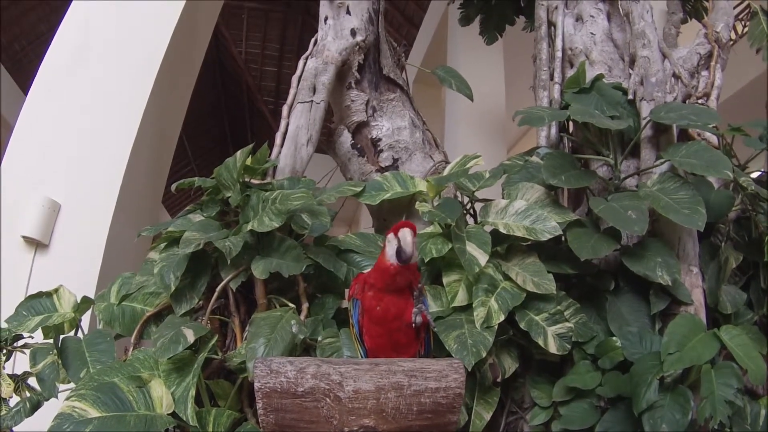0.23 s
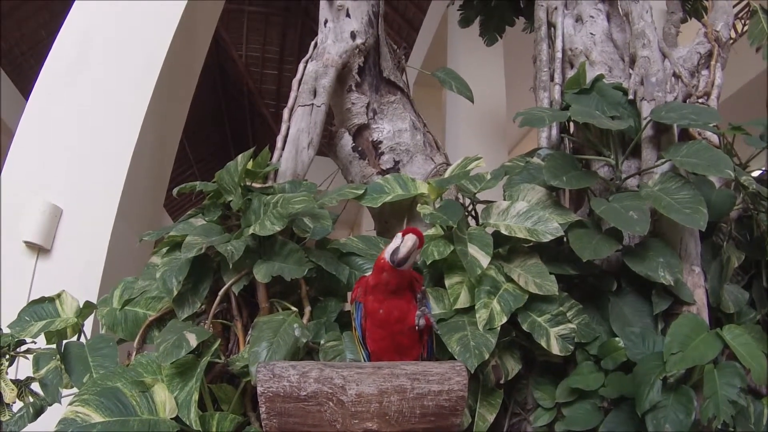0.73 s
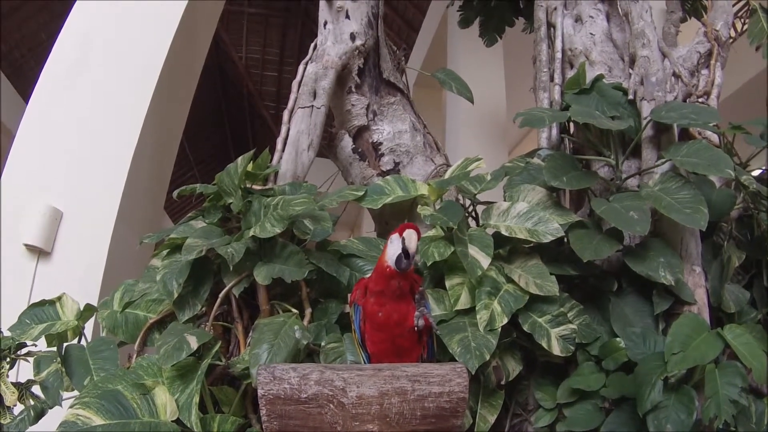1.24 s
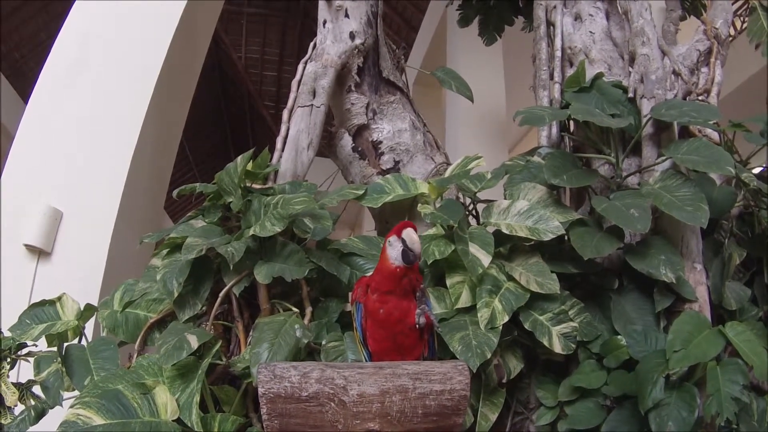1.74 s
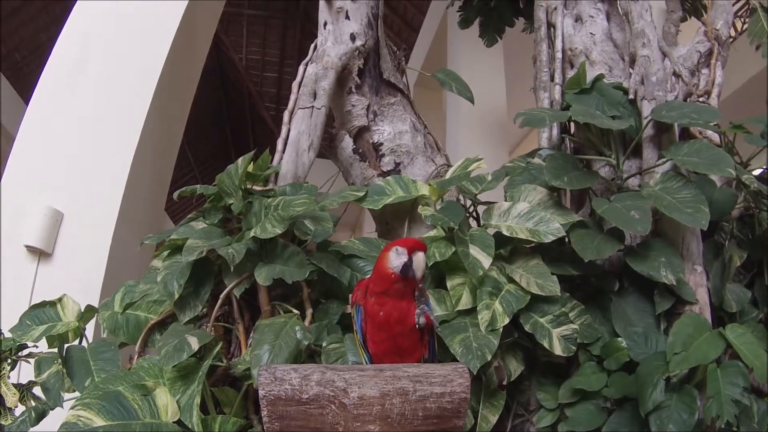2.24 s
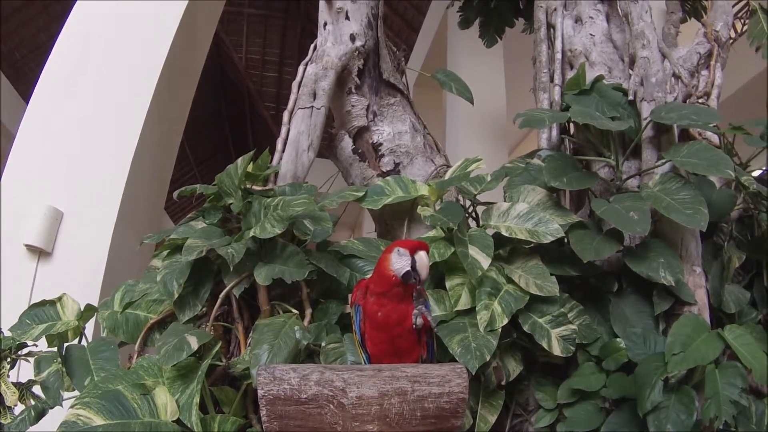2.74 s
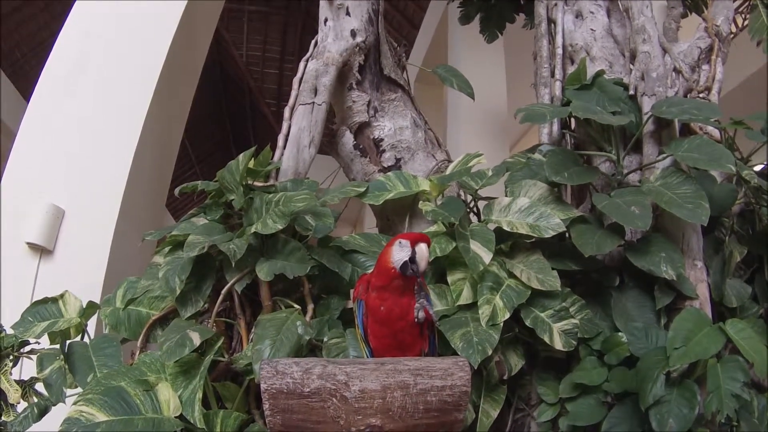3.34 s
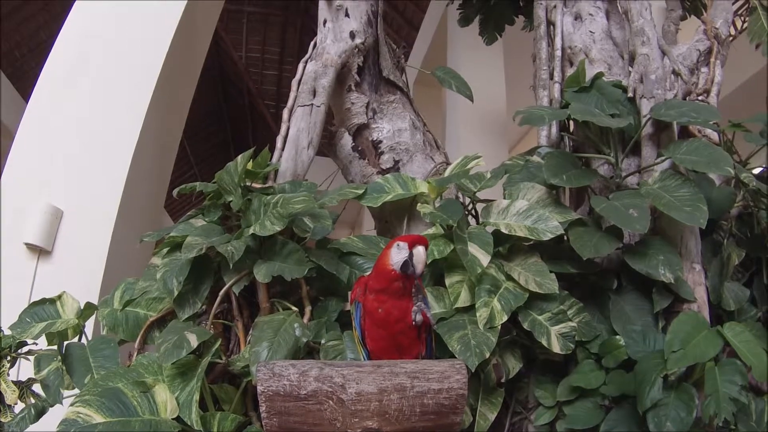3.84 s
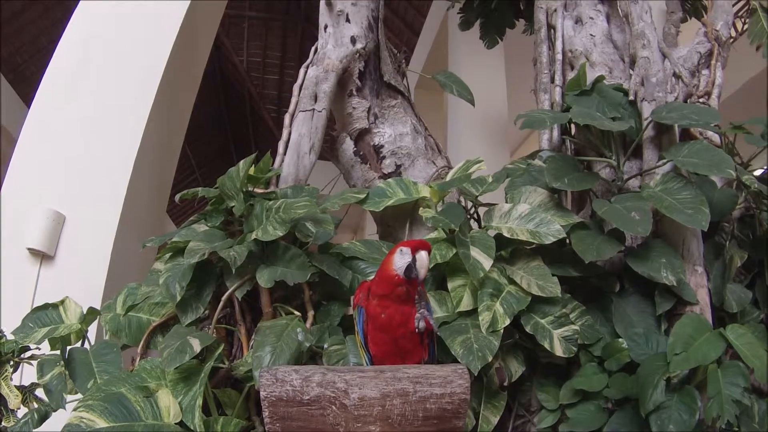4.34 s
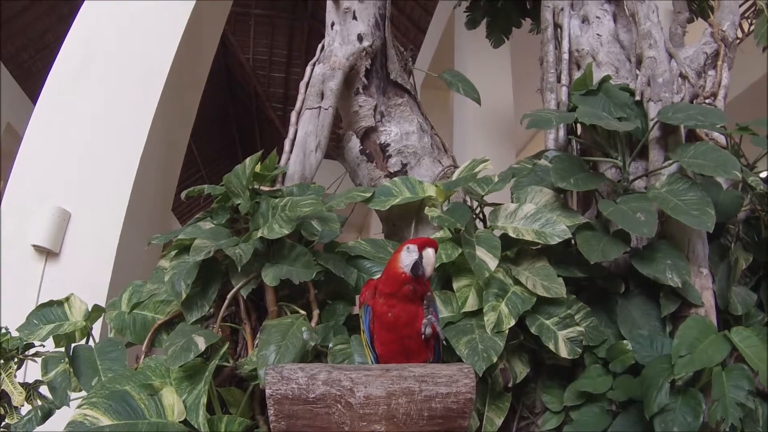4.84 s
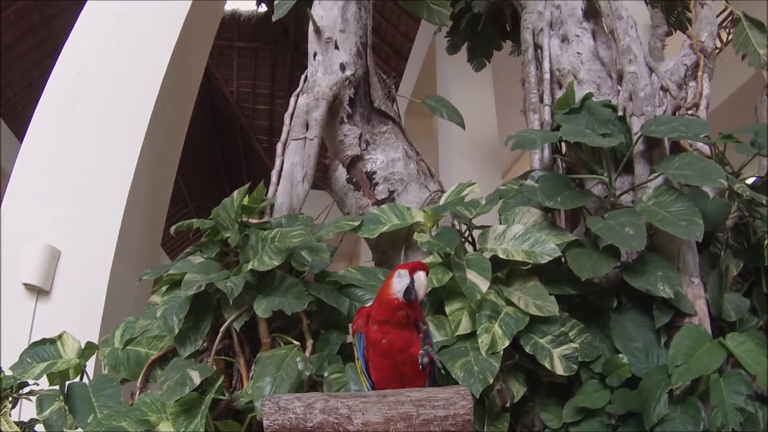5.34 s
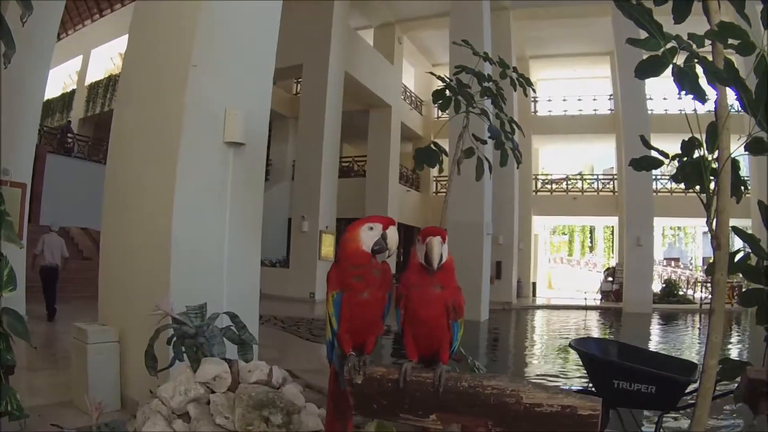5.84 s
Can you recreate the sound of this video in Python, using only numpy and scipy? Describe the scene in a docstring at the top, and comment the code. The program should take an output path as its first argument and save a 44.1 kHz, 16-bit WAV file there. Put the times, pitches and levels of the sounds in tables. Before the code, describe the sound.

A macaw gives three short, harsh squawks in an echoing hall over faint water hiss, then wind rumble and handling clicks.

```python
"""A wide open hall, heard through a small camera's microphone. From the start water hisses far off
and a faint draught buffets the microphone; a finger ticks on the camera body. Close by, a macaw
squawks at 1.1, 2.4 and 4.1 s: rough pulses from its syrinx ring through throat, windpipe, beak and
mouth, and the hall answers. Near 5 s the draught swells amid finger ticks and low thumps. At 5.6 s
a brief dropout cuts off a low swell with a click; a last tick follows as the draught dies down."""
import sys
import numpy as np
from scipy import signal
from scipy.fft import rfft, irfft, next_fast_len
from scipy.io import wavfile
from scipy.ndimage import uniform_filter1d, map_coordinates

SR = 44100
rng = np.random.default_rng(int(sys.argv[2]) if len(sys.argv) > 2 else 0)


def put_to_file(sound):
    """Save the sound as 16-bit audio at rate SR, in the file named by the first command-line argument."""
    columns = np.atleast_2d(sound).T  # one column per channel
    safe = np.clip(columns, -1, 1)
    whole_steps = np.round(safe * 32767)
    wavfile.write(sys.argv[1], SR, whole_steps.astype(np.int16))


N = 268965

# Far water, ahead of the microphone port: (time [s], level [dB])
WATER_LEVEL = [(0, -54.5), (4.6, -55), (5.6, -55), (5.7, -58), (6.1, -60.5)]
# Colour of its hiss: (frequency [Hz], relative density [dB])
WATER_SPECTRUM = [(71, -7), (120, -5), (260, -10.5), (432, -11.5), (917, -14.5), (1430, -12.5),
                  (2290, -11.5), (2700, -19), (6730, -23.5), (14600, -41), (15500, -62.5)]
# Draught on the microphone: (time [s], level [dB])
DRAUGHT_LEVEL = [(0, -41), (2.1, -46.5), (2.6, -51.5), (3.5, -49.5), (4.5, -48.5), (4.85, -28.5),
                 (5.45, -25.5), (5.7, -31.5), (6.1, -40.5)]
# Colour of its buffeting: (frequency [Hz], relative density [dB])
DRAUGHT_SPECTRUM = [(4.7, -34), (8.0, 2.5), (19, 1.5), (41, -6.5), (308, -43.5), (400, -50.5), (520, -60),
                    (880, -120)]
# Fingers on the camera: (time [s], knock peak [dB], knock [Hz], snap [dB re knock], snap [Hz], t60 [s])
FINGER_TICKS = [(0.217, -36, 1450, -3.5, 3600, 0.019), (4.912, -26.5, 2180, -26, 4930, 0.0077),
                (5.032, -27, 1190, -11, 9600, 0.0066), (5.151, -29.5, 1160, -7, 5300, 0.011),
                (5.283, -32.5, 1370, -25.5, 2500, 0.026), (5.687, -37.5, 1920, -14.5, 7050, 0.11)]
# Short thumps and, at 5.567 s, a slow low swell: (time [s], peak [dB], time constant [s])
LOW_PULSES = [(0.221, -32, 0.0057), (0.546, -31.5, 0.0029), (1.93, -35.5, 0.0049), (2.55, -35, 0.0027),
              (3.877, -38.2, 0.002), (4.661, -32, 0.0042), (4.907, -24, 0.0053), (5.027, -18, 0.0043),
              (5.149, -18, 0.0096), (5.567, -24, 0.041), (5.689, -24, 0.0097)]
# One curve a squawk: (time [s], effort as windpipe level [dB], mouth [Hz], beak [dB re windpipe])
SQUAWKS = [
    [(1.12, -65.5, 6930, -18), (1.145, -45.5, 6800, -9.5), (1.17, -37.5, 6660, -4),
     (1.21, -34.5, 6470, -18), (1.245, -43, 6320, -21), (1.268, -53, 6430, -18), (1.31, -44.5, 6850, -10),
     (1.335, -37, 6250, -9), (1.385, -40, 6400, -9), (1.42, -42, 6550, -10), (1.445, -64, 6700, -23)],
    [(2.4, -62, 5920, 1), (2.45, -48.5, 6370, -4), (2.485, -37, 6400, -10), (2.55, -40.5, 6270, -5.5),
     (2.625, -36, 6480, -4), (2.692, -38.5, 6630, -1.5), (2.712, -41.5, 6770, -20),
     (2.742, -36.5, 6740, -20.5), (2.785, -40, 6420, -26.5), (2.812, -39, 6800, -26),
     (2.828, -30.5, 6890, -28), (2.87, -45.5, 6620, -22.5), (2.89, -40, 6800, -27),
     (2.935, -42.5, 6650, -25), (2.97, -60, 6740, -14)],
    [(4.08, -66, 6880, 1), (4.14, -51.5, 6680, 6.5), (4.175, -39, 6400, -1.5), (4.197, -32.5, 6220, -4),
     (4.235, -35, 6600, -8), (4.306, -36, 6400, -13.5), (4.36, -41.5, 6650, -7.5), (4.39, -41.5, 7050, -11),
     (4.42, -52.5, 6500, -14)],
]
# Vocal postures: (start [s], pulse-pair rate from [Hz], to [Hz], throat [Hz], base roughness [0-1],
# evenness of the two pulses [0-1], base throat, lower mouth, upper mouth [each dB re windpipe])
VOCAL_POSTURES = [(1.119, 317.9, 323.5, 1580, 0.43, 0.65, -6, -28, -12.5),
                  (1.169, 328.3, 278.6, 1390, 0.31, 0, -2, -37, -12),
                  (1.275, 283, 290, 1410, 0.51, .1, 1.5, -31, -13.5),
                  (1.322, 259.5, 262.6, 1560, 0.4, .45, -1, -30, -20),
                  (1.37, 266, 280.2, 1490, 0.2, 0.6, 0, -17.5, -14),
                  (2.4, 479.7, 471.6, 1300, 0.6, 0, -2.5, -12.5, -15),
                  (2.523, 389.4, 374.2, 1490, .62, 0.57, -1.5, -11, -12),
                  (2.7, 374, 370.9, 1555, 0.69, 0.6, -3, -15, -17.5),
                  (2.75, 343.7, 338.6, 1060, 0.24, 0, -1.5, -15, -15),
                  (2.803, 381.8, 384.2, 1544, 0.39, 0.02, -1.5, -14.5, -15.5),
                  (2.845, 380, 392.5, 1520, 0.72, .3, -6, -19.5, -20),
                  (4.08, 290.9, 291.4, 1440, .5, .87, 2, -8, -11),
                  (4.159, 288.8, 298.2, 1200, 0.34, 1, -5, -11, -17.5),
                  (4.233, 326.8, 325.5, 1420, 0.45, 0.2, -4.5, -18, -18),
                  (4.318, 371.5, 390.6, 1540, 0.54, .4, -4, -14.5, -16.5)]
# Windpipe resonances: (frequency [Hz], width [Hz], gain [dB])
WINDPIPE_MODES = [(1950, 160, -5), (2300, 150, 0), (2480, 200, -5)]
# Beak resonances: (frequency [Hz], width [Hz], gain [dB])
BEAK_MODES = [(2980, 260, 0), (3540, 450, -4), (4040, 420, -7)]
# Upper mouth bands: (multiple of the mouth frequency [ratio], width [Hz], gain [dB])
UPPER_MOUTH_BANDS = [(1, 625, 7), (1.45, 690, -8), (1.88, 800, -15.5)]
# Reverberation of the hall: (frequency [Hz], t60 [s])
HALL_DECAY = [(300, .6), (1500, 0.86), (2300, 1), (3000, 0.83), (4000, 0.8), (10000, 0.4)]
# Resonances of the microphone port: (frequency [Hz], width [Hz], gain [dB])
MIC_PORT_MODES = [(1530, 132, -0.5), (1890, 65, -7), (2344, 135, -2), (2975, 53, -2), (4880, 78, -9.5)]

POSTURE_SHIFT_S = 0.016
# Below full effort the voice roughens and the throat stands out more.
FULL_EFFORT_DB, ROUGH_PER_DB, THROAT_PER_DB = -38, 0.08, 0.18
SILENCE_FROM_S, SILENCE_TO_S = 5.592, 5.6735
ROLLOFF_HZ, TOP_HZ = 14800, 16300


def amp(db):
    """Decibels to amplitude."""
    return 10 ** (np.asarray(db) / 20)


def unit(x):
    """x scaled to an RMS of 1."""
    return x / np.sqrt(np.mean(x ** 2) + 1e-20)


def along(points, hz):
    """(frequency [Hz], value) points, read on a log axis."""
    f, values = np.transpose(points)
    return np.interp(np.log(hz + 1), np.log(f + 1), values)


def curves(rows, t):
    """Every column after the time, read at times t."""
    times, *columns = np.transpose(rows)
    return [np.interp(t, times, column) for column in columns]


def wobble(rate, size):
    """A smooth random curve, rate knots a second."""
    knots = rng.standard_normal(int(size * rate / SR) + 4)
    return map_coordinates(knots, [np.arange(size) * rate / SR])


def filtered(x, response):
    """x through a complex frequency response."""
    size = next_fast_len(len(x) + 8192)
    return irfft(rfft(x, size) * response(np.fft.rfftfreq(size, 1 / SR)), size)[:len(x)]


def peak(f, hz, width_hz):
    """One causal resonance of gain 1."""
    return 1j * f * width_hz / (hz * hz - f * f + 1j * f * width_hz)


def modes(f, table):
    """Resonances summed with alternating signs."""
    return sum((-1) ** k * amp(db) * peak(f, hz, width) for k, (hz, width, db) in enumerate(table))


def moving(x, track_hz, response):
    """A resonance that follows track_hz: five still ones, cross-faded."""
    steps = np.linspace(track_hz.min() - 1, track_hz.max() + 1, num=5)
    fades = np.clip(1 - abs(track_hz - steps[:, None]) / (steps[1] - steps[0]), 0, 1)
    return sum(fade * filtered(x, lambda f: response(f, hz)) for fade, hz in zip(fades, steps))


def water():
    """Water far from the microphone: a smooth hiss with faint patches."""
    spectra = signal.stft(rng.standard_normal(N), nperseg=512)[2]
    patches = uniform_filter1d(rng.standard_normal(spectra.shape), 6, axis=0)
    patches = uniform_filter1d(patches, 14, axis=1)
    noise = signal.istft(spectra * amp(1.78 * unit(patches)), nperseg=512)[1][:N]
    hiss = filtered(noise, lambda f: amp(along(WATER_SPECTRUM, f)))
    level_db = curves(WATER_LEVEL, np.arange(N) / SR)[0]
    return amp(level_db) * unit(hiss)


def draught():
    """Moving air pushes the microphone's diaphragm in slow lumps."""
    push = filtered(rng.standard_normal(N), lambda f: amp(along(DRAUGHT_SPECTRUM, f)))
    lumps = amp(2.5 * wobble(12, N))
    level_db = curves(DRAUGHT_LEVEL, np.arange(N) / SR)[0]
    return amp(level_db) * unit(lumps * push)


def fingers():
    """Fingers tick on the camera body: short noisy knocks with a high snap."""
    out, t = np.zeros(N + SR), np.arange(SR // 4) / SR
    for start, db, knock_hz, snap_db, snap_hz, t60 in FINGER_TICKS:
        burst = rng.standard_normal(len(t)) * amp(-60 * t / t60) * (1 - np.exp(-t / 0.00083))
        knock = filtered(burst, lambda f: peak(f, knock_hz, 460) * peak(f, 0.63 * knock_hz, 1400))
        snap = filtered(burst, lambda f: peak(f, snap_hz, 0.47 * snap_hz) ** 2)
        tick = knock / abs(knock).max() + amp(snap_db) * snap / abs(snap).max()
        out[round(start * SR):][:len(t)] += amp(db) * tick
    return out[:N]


def low_pulses():
    """Single pressure pulses: the short ones thump, the slow one swells."""
    out, t = np.zeros(N + SR), np.arange(SR // 4) / SR
    for start, db, tau in LOW_PULSES:
        age = t / tau
        pulse = age * (2 - age) * np.exp(-age)
        out[round(start * SR):][:len(t)] += amp(db) * pulse / pulse.max()
    return out[:N]


def posture(t):
    """The bird holds each posture while its pulse rate glides, then shifts quickly into the next."""
    rows = [row for row in VOCAL_POSTURES if t[0] - POSTURE_SHIFT_S < row[0] < t[-1]]
    ends = [row[0] for row in rows[1:]] + [t[-1]]
    knots = []
    for (start, from_hz, to_hz, *held), end in zip(rows, ends):
        knots.append((start + POSTURE_SHIFT_S / 2, from_hz, *held))
        knots.append((end - POSTURE_SHIFT_S / 2, to_hz, *held))
    return curves(knots, t)


def syrinx(pair_hz, rough, even):
    """Two pulses a cycle; roughness shakes their timing and size and mixes in turbulent air."""
    size = len(rough)
    rough, even = np.clip(rough, 0, 1), np.clip(even, 0, 1)
    waver = 0.0306 * wobble(120, size) + 0.03 * wobble(30, size)
    count = np.cumsum(2 * pair_hz * (1 + rough * waver)) / SR
    beats = np.arange(1, int(count[-1]) - 1)
    # Jitter blurs the high harmonics first.
    jitter = 0.096 * rng.standard_normal(len(beats)) * np.interp(beats, count, rough)
    at = np.interp(beats + jitter, count, np.arange(size))
    i = at.astype(int)
    strength = np.where(beats % 2, 1, even[i]) * amp(5.8 * rough[i] * rng.standard_normal(len(i)))
    pulses = np.bincount(i, strength * (1 - at + i), size + 1)
    pulses += np.bincount(i + 1, strength * (at - i), size + 1)
    # Air is breathed through the slit once a cycle; the membranes catch and let go.
    air = unit(rng.standard_normal(size) * (1 + 0.39 * np.cos(np.pi * count)))
    flutter = amp(4.4 * rough * np.tanh(wobble(59.07, size)))
    falling_sweep = lambda f: np.exp(1j * np.pi * 0.004 * (f - 4500).clip(0) ** 2 / 4500)
    buzz = unit(filtered(pulses[:size], falling_sweep) / np.sqrt(pair_hz * (1 + even ** 2)))
    voiced = np.sqrt(1 - rough ** 3) * buzz + rough ** 1.5 * air
    return flutter * voiced, flutter * air


def throat_response(f, hz):
    """The throat rings at hz, with a weaker resonance below."""
    return (peak(f, hz, 260) - amp(-14) * peak(f, 0.43 * hz, 550)) * peak(f, 1087, 1830) ** 2


def lower_mouth(f, hz):
    """One thin band below the mouth frequency."""
    return peak(f, 0.81 * hz, 280) * peak(f, 0.78 * hz, 1500)


def upper_mouth(f, hz):
    """Thin bands at and above the mouth frequency."""
    return sum(amp(db) * peak(f, ratio * hz, width) ** 2 for ratio, width, db in UPPER_MOUTH_BANDS)


def macaw():
    """Close to the microphone, the syrinx sounds through windpipe, beak and a moving throat and mouth."""
    out = np.zeros(N)
    for squawk in SQUAWKS:
        start, stop = round(squawk[0][0] * SR), round(squawk[-1][0] * SR)
        t = np.arange(start, stop) / SR
        effort_db, mouth_hz, beak_db = curves(squawk, t)
        pair_hz, throat_hz, rough, even, throat_db, lower_db, upper_db = posture(t)
        slack_db = FULL_EFFORT_DB - effort_db
        voiced, air = syrinx(pair_hz, rough + ROUGH_PER_DB * slack_db.clip(0), even)
        breathy = voiced + 0.3 * air  # the mouth bands carry more turbulence
        throat = moving(voiced, throat_hz, throat_response)
        windpipe = filtered(voiced, lambda f: modes(f, WINDPIPE_MODES) * peak(f, 2260, 1750) ** 2)
        beak = filtered(voiced, lambda f: modes(f, BEAK_MODES) * peak(f, 3420, 1500) ** 2)
        voice = (unit(windpipe)
                 - amp(throat_db + THROAT_PER_DB * slack_db) * unit(throat)
                 - amp(beak_db) * unit(beak)
                 + amp(lower_db) * unit(moving(breathy, mouth_hz, lower_mouth))
                 + amp(upper_db) * unit(moving(breathy, mouth_hz, upper_mouth)))
        fade = np.clip(np.minimum(t - t[0], t[-1] - t) / 0.0085, 0, 1)
        out[start:stop] += fade * amp(effort_db) * voice
    return out


def hall(x):
    """The hall answers 16 ms late, each frequency dying at its own speed."""
    hz, t, spectra = signal.stft(rng.standard_normal(SR), SR, nperseg=256)
    decay = amp(-60 * t / along(HALL_DECAY, hz)[:, None])
    tail = signal.istft(spectra * decay, SR, nperseg=256)[1]
    return signal.fftconvolve(np.pad(x, (700, 0)), tail / np.linalg.norm(tail))[:N]


def scene():
    """Bird, hall and water arrive through the microphone port; the rest bypasses it."""
    bird = macaw()
    airborne = bird + amp(-16) * hall(bird) + water()
    mic_port = lambda f: 1 + sum(amp(db) * peak(f, hz, width) for hz, width, db in MIC_PORT_MODES)
    return (filtered(airborne, mic_port) + draught() + fingers() + low_pulses())[None]


def record(dry):
    """A brief dropout cuts off the low swell so that it clicks; the top treble is cut throughout."""
    t = np.arange(N) / SR
    gated = dry[0] * ((t < SILENCE_FROM_S) | (t > SILENCE_TO_S))
    return filtered(gated, lambda hz: (hz < TOP_HZ) / np.sqrt(1 + (hz / ROLLOFF_HZ) ** 24))[None]


dry = scene()
out = record(dry)
put_to_file(out)
```